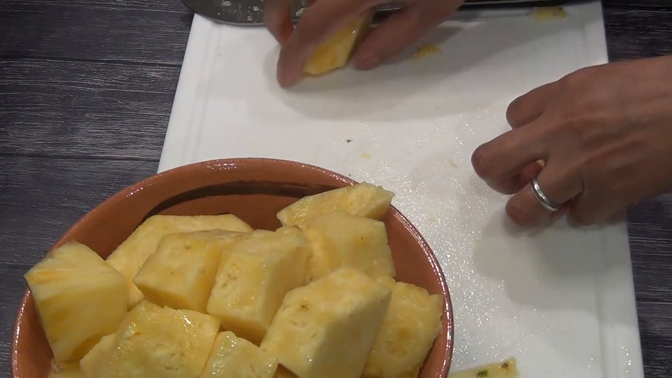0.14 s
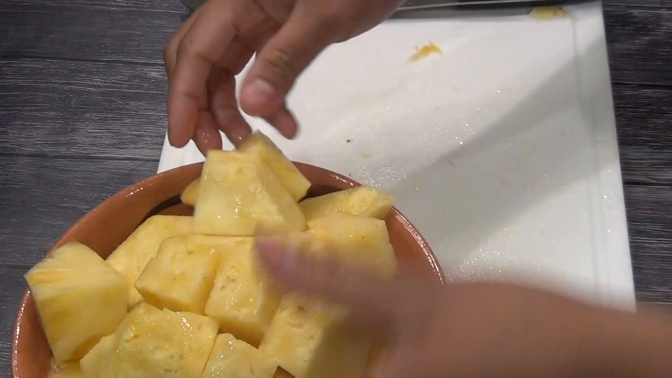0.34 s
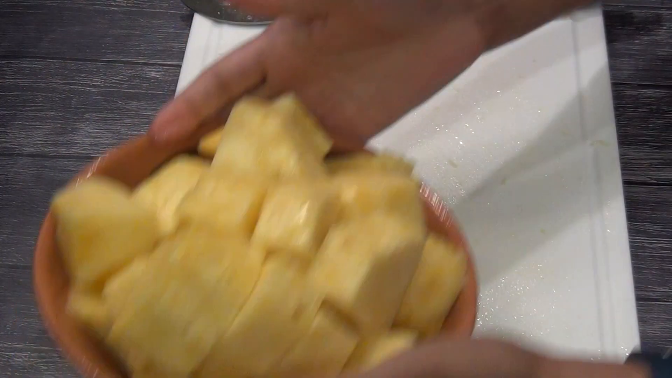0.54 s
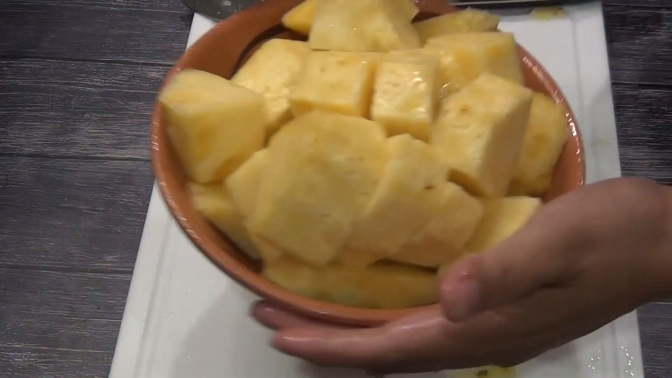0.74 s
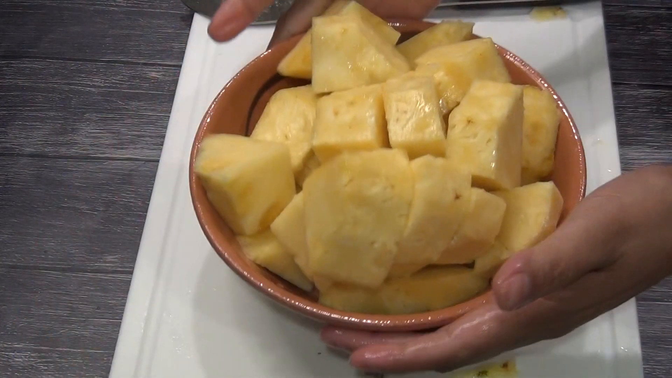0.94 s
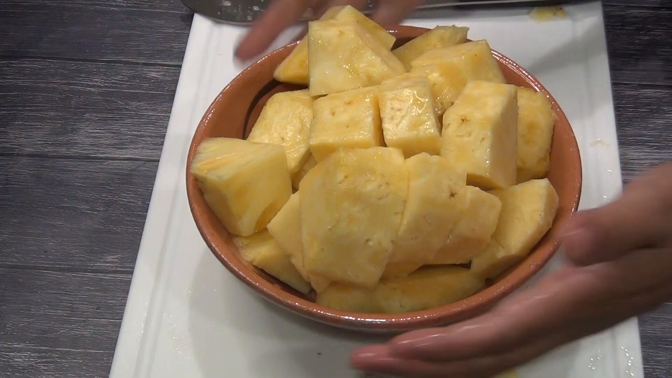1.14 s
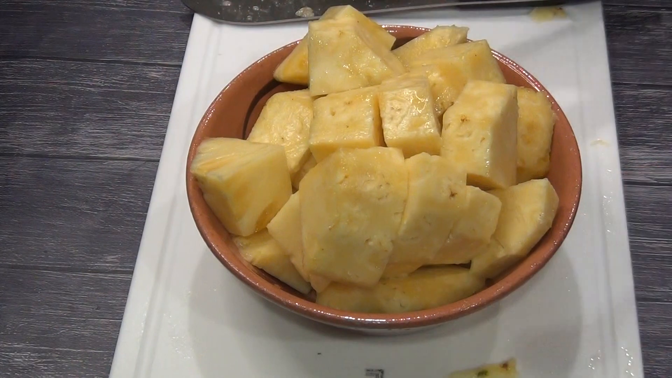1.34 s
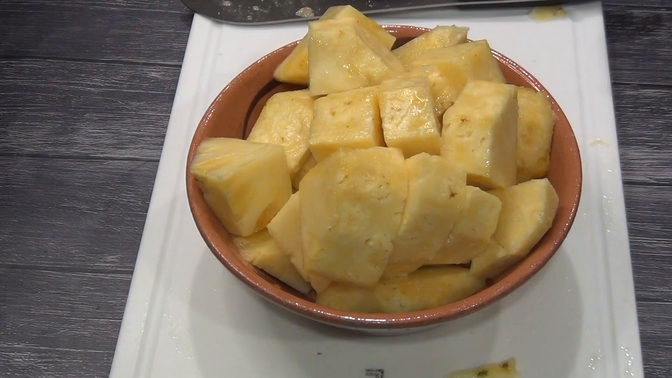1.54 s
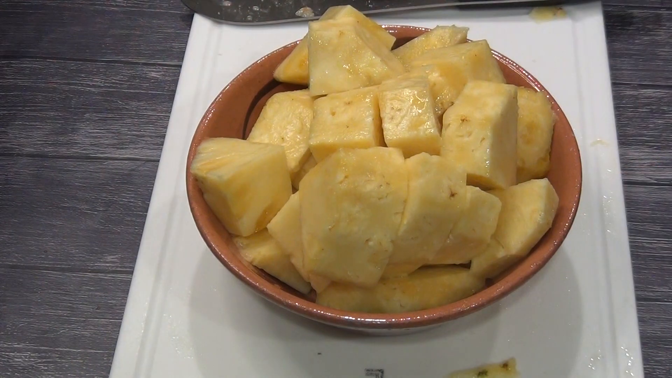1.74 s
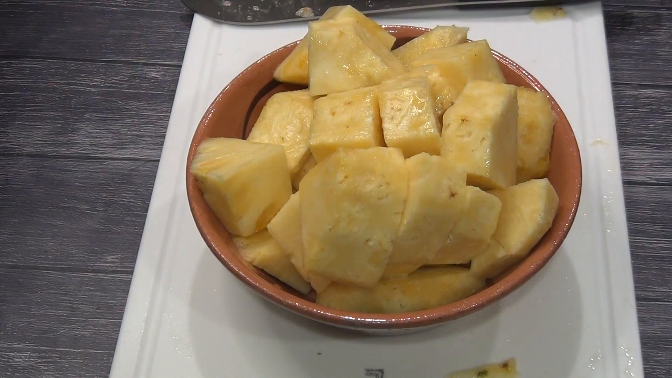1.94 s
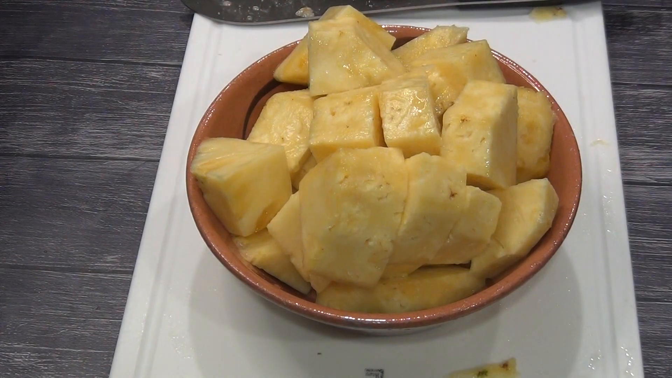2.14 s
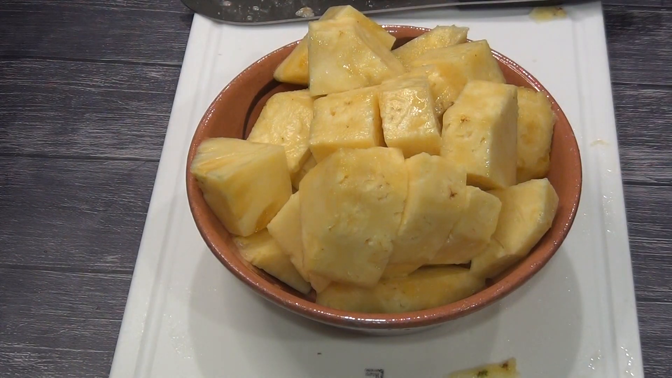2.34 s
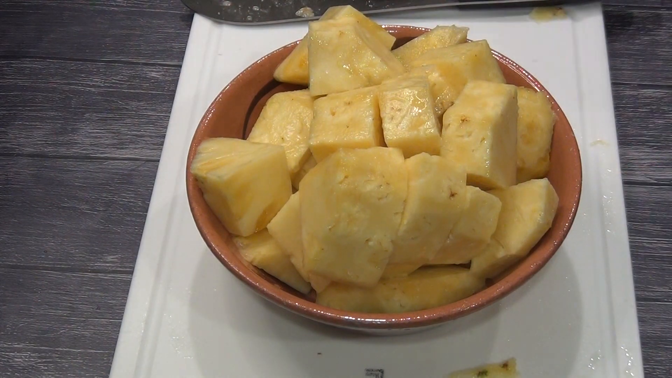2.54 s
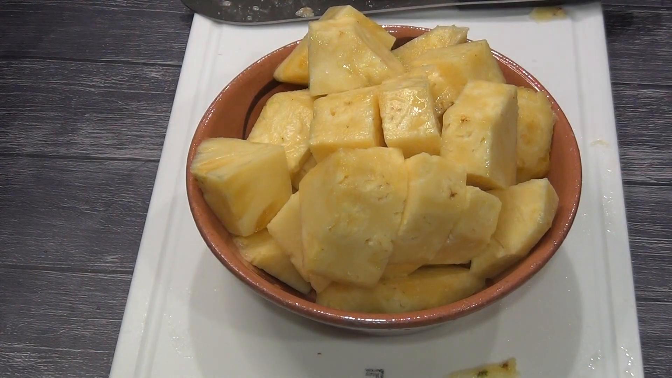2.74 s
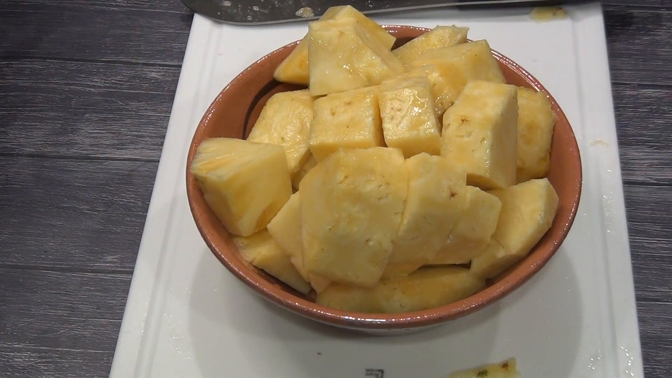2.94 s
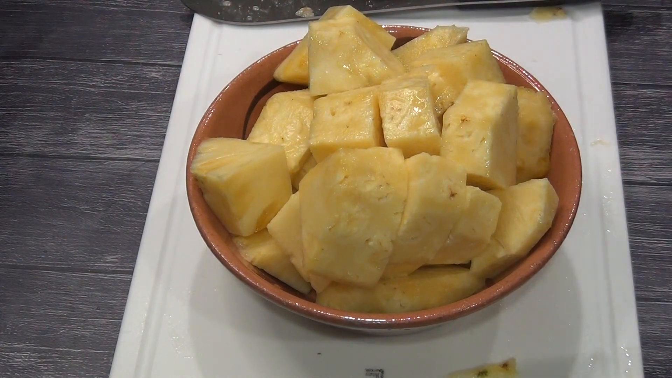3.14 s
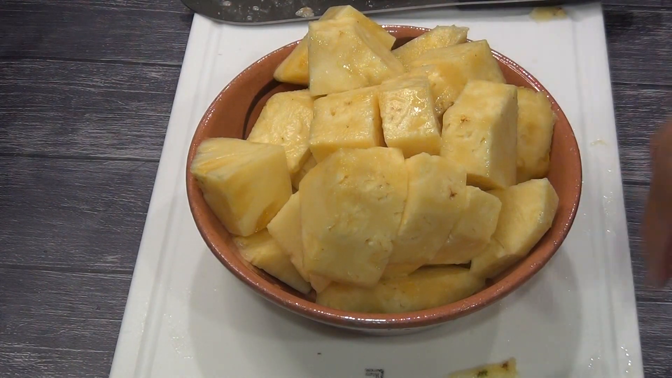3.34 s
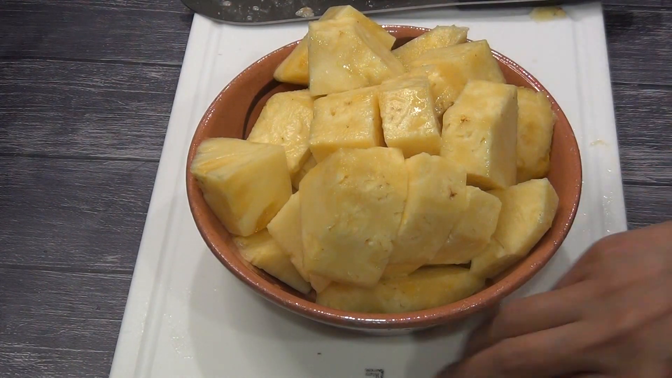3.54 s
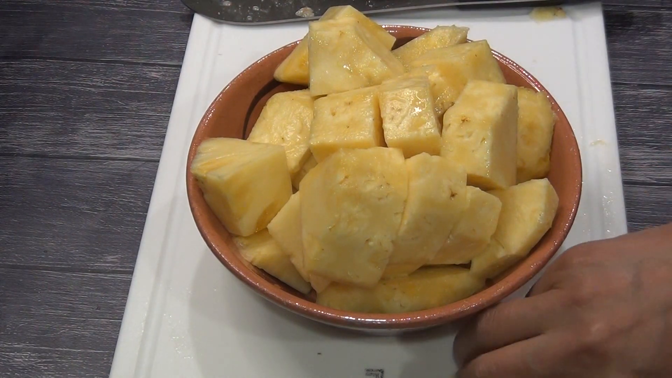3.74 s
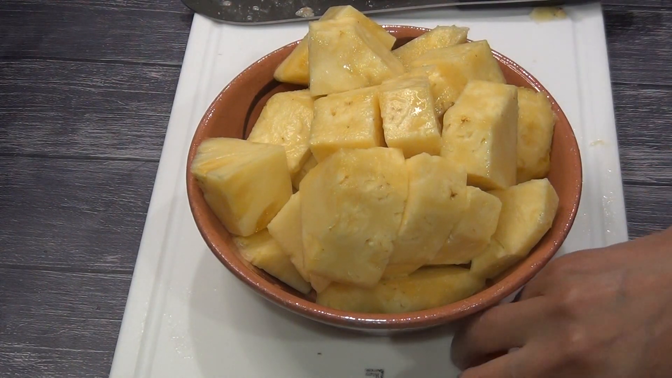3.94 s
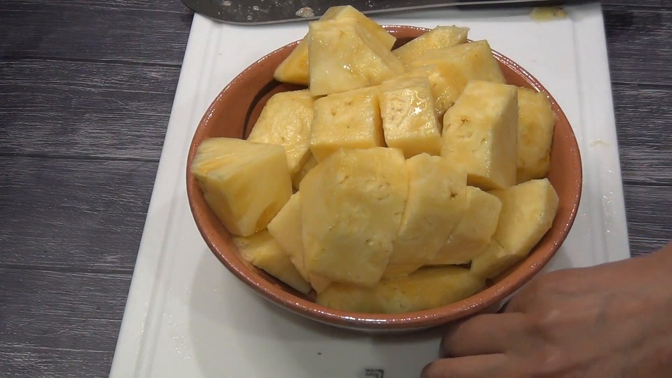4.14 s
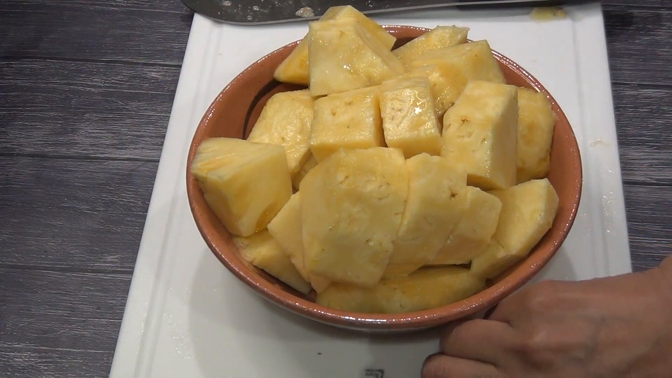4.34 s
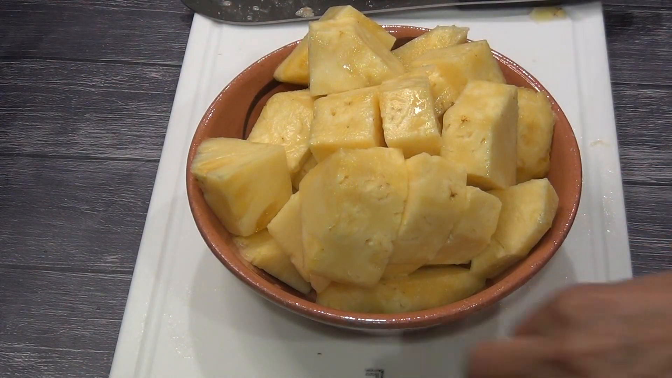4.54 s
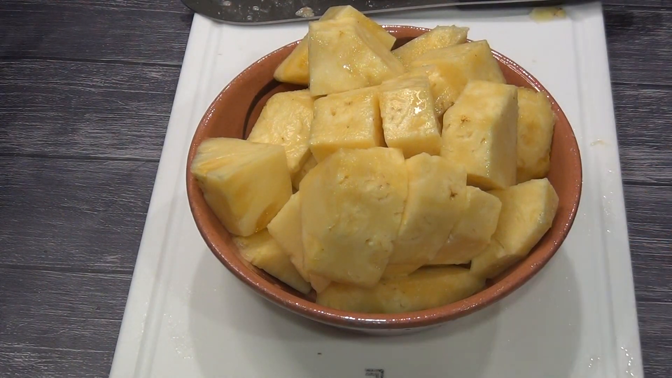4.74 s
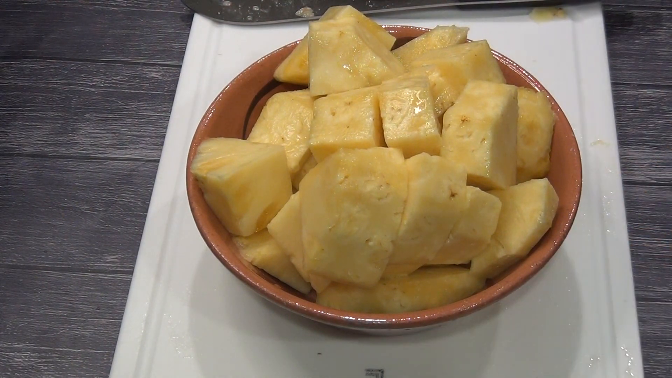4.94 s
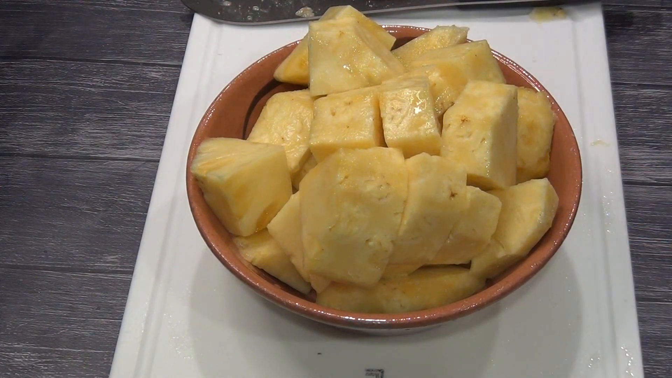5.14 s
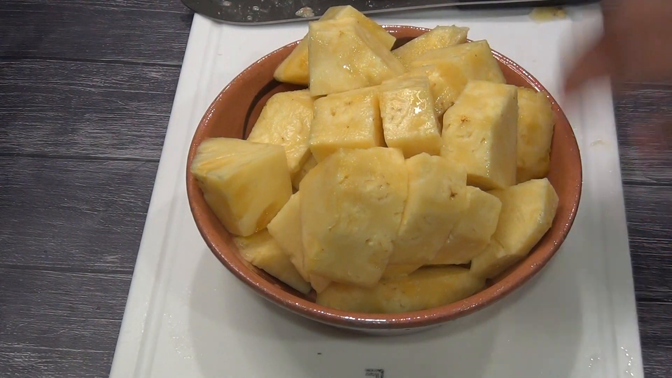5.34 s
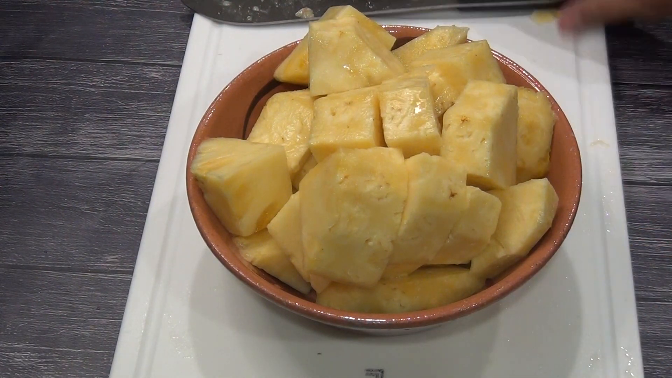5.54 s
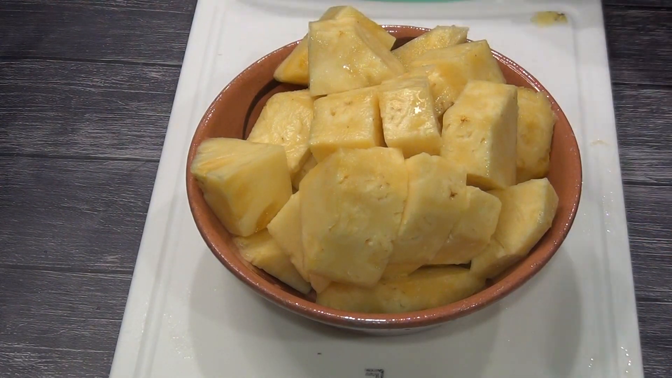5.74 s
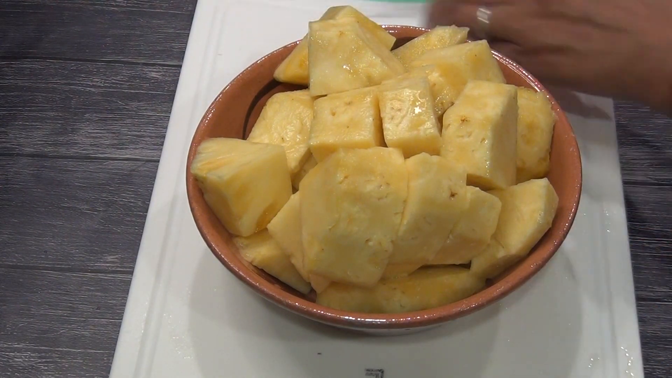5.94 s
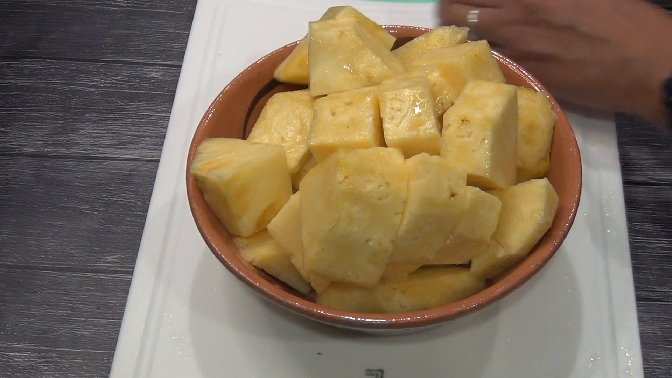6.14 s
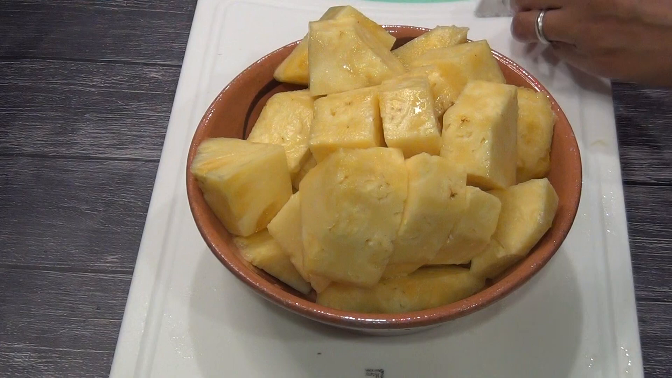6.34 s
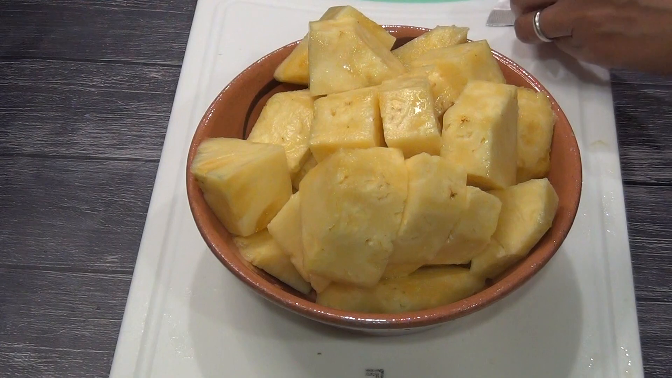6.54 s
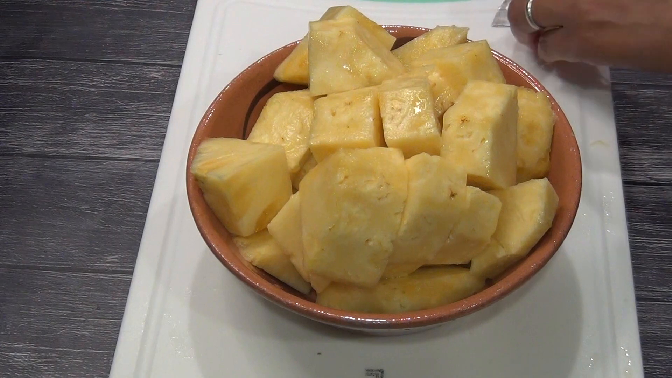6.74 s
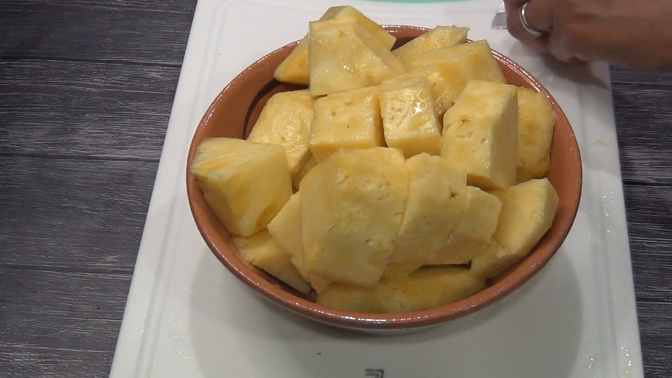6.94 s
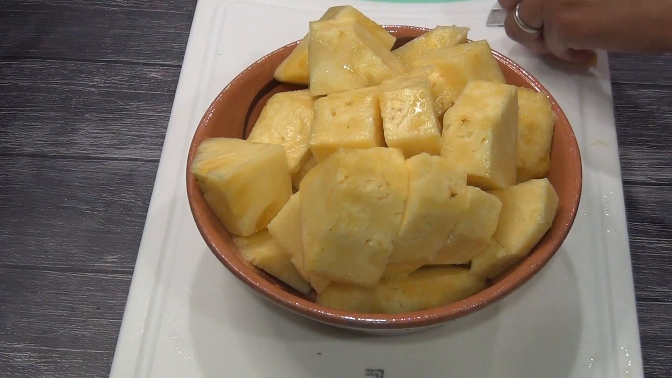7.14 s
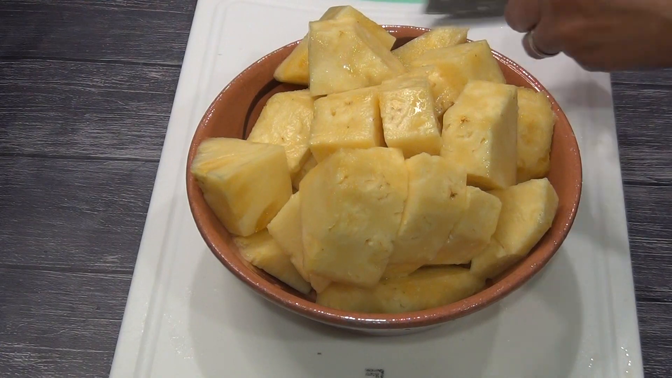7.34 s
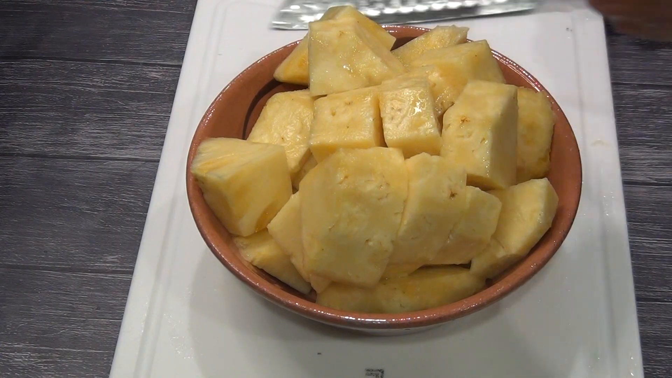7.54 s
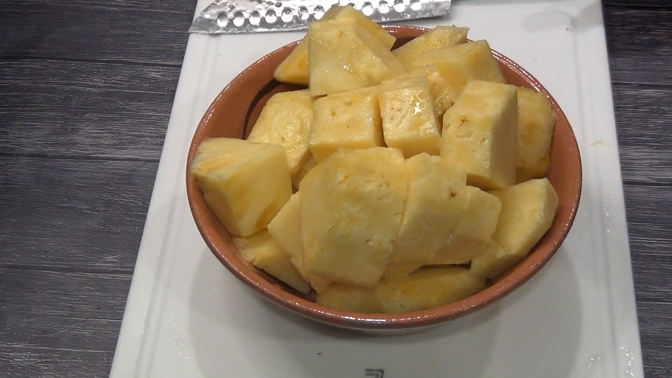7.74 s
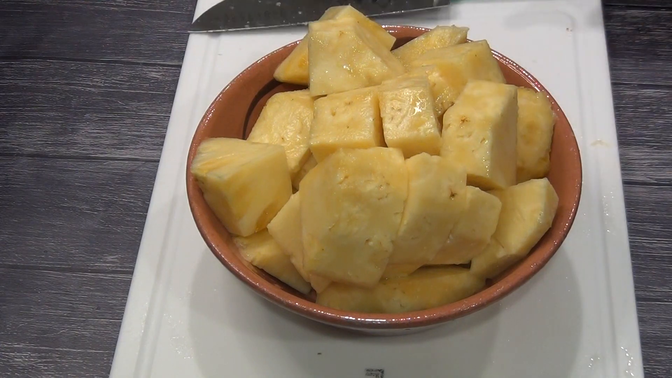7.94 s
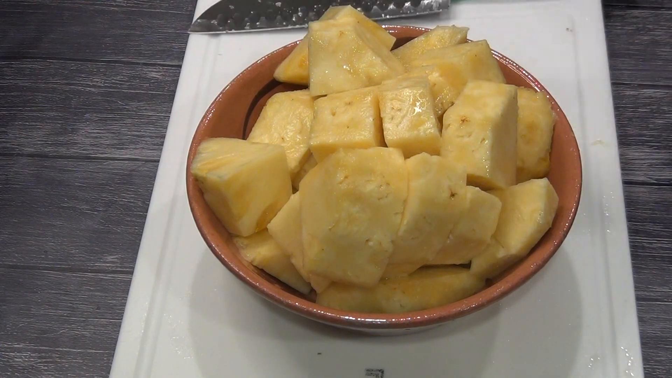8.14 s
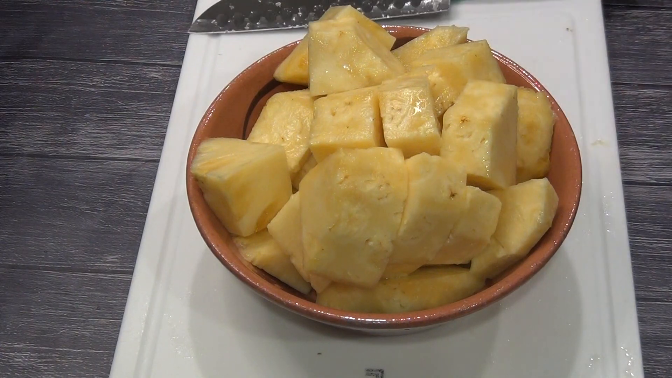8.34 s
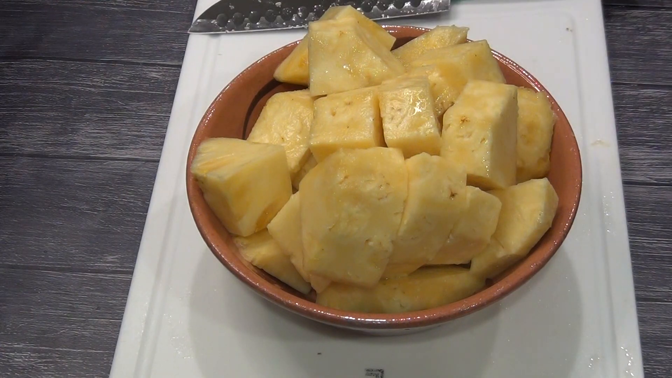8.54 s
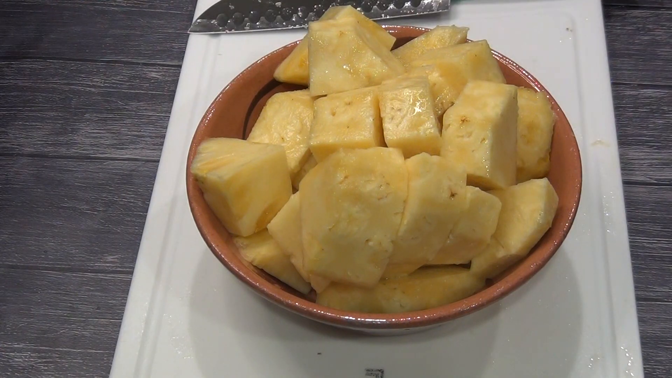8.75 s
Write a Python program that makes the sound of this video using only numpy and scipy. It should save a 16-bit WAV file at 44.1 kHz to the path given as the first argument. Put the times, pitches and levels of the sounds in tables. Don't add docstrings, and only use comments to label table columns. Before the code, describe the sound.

Half a second of silence, then the tail of a ringing steel blade cuts in abruptly. A ceramic bowl lands with a hard double knock on a plastic board. Quiet wet clicks and sleeve rustles follow, then fingers tick and scrape scraps. A knife handle knocks, the blade drags and scratches, later slaps flat, drops and rocks in quickening taps. Close microphone, tiled kitchen, faint fridge hum.

```python
import sys
import numpy as np
from scipy import signal
from scipy.fft import rfft, irfft, next_fast_len
from scipy.io import wavfile
from scipy.ndimage import uniform_filter1d, map_coordinates

SR = 44100
rng = np.random.default_rng(int(sys.argv[2]) if len(sys.argv) > 2 else 0)


def generate_wav(sig):
    pcm = np.round(np.clip(np.atleast_2d(sig).T, -1, 1) * 32767).astype(np.int16)
    wavfile.write(sys.argv[1], SR, pcm)


def convert_level_to_amplitude(level_db):
    exponent = np.asarray(level_db, float) / 20
    return 10 ** exponent


N = 388103

# [f/Hz, level/dB per Hz]
AIR_SPECTRUM = [(71, -47), (120, -8.5), (153, -7.5), (200, -8.5), (236, -3.5), (295, -2.5), (393, -5),
                (670, -5.5), (727, -8), (1190, -7), (1550, -10), (1790, -9), (2870, -16), (3660, -17.5),
                (16000, -29)]
RUMBLE_SPECTRUM = [(13, -42), (22, -5), (38, 5.5), (70, 11.5), (160, -13.5), (210, -36), (350, -120)]
# [f/Hz, width/Hz, level/dB over the air; for the two lowest, over 10 dB above the rumble]
FRIDGE_LINES = [(120.3, 5.2, -14.5), (160.2, 4.2, -17), (191.56, 2.3, -12.5), (213.2, 2.7, -18),
                (284, 2.6, -14.5), (427, 11, -19.5), (497, 9.4, -19), (675, 9.2, -14.5), (1120, 24, -15.5)]
# [t/s, level/dB]
AIR_LEVEL = [(0.7, -63.5), (1.5, -63.2), (2.66, -61), (3.8, -57.5), (4.8, -56.7), (5.7, -54.2),
             (6.45, -52.3), (7.6, -53), (8.8, -56)]
# [t/s, level/dB]
TRAFFIC_SWELLS = [
    (3.09, -71),
    (3.9, -72),
    (6.2, -72),
    (8.8, -69),
]

# [f/Hz, width/Hz, level/dB]
BLADE_MODES = [(836, 9.2, 3), (1460, 140, 2.5), (2600, 120, -4), (3230, 34, -5), (3670, 57, 2),
               (4000, 18, -13.5), (3900, 36, -8), (5330, 97, -9), (6940, 44, -7), (8090, 77, -19),
               (8540, 140, -9), (10600, 75, -10)]
BOWL_MODES = [(400, 50, -4), (694, 290, 1), (1250, 1780, 17.5), (1900, 290, 1), (3500, 900, -10),
              (5560, 4200, -2)]
SCRAP_MODES = [(1090, 110, -1), (1400, 168, -1), (1810, 22, -4.5), (2340, 20, -20), (3000, 60, -5),
               (4040, 150, -10), (5130, 47, -19), (6300, 400, -24.5)]
DRAGGED_MODES = [(853, 71, 1.5), (1580, 44, -2), (1980, 41, -2), (2285, 32, -26), (2590, 98, -4),
                 (3660, 115, -3.5), (4560, 86, -8), (5560, 120, -12.5)]
HANDLE_MODES = [(535, 256, -6), (1160, 840, -6), (2900, 700, -13), (4070, 1140, -21)]
EDGE_MODES = [(2500, 70, 4), (3500, 60, 0), (3810, 46, -4), (5300, 150, -7), (7340, 50, -7),
              (11330, 40, -9)]
BOARD_MODES = [(620, 94, -1.5), (762, 44, 5.5), (1040, 120, 2), (1550, 86, 2), (2008, 92, 0.5),
               (2620, 420, -8), (3520, 510, -11.5), (5120, 200, -10.5), (7360, 140, -11), (8100, 62, -5.5)]
# [f/Hz, level/dB per Hz]
CRACK_SPECTRUM = [(1470, -11), (2500, 3), (5270, -15.5), (8400, -26.5), (16000, -41)]
CLOTH_SPECTRUM = [(530, -22), (900, -1.5), (1460, -13), (1770, -2), (2600, -4.5), (5550, -6.5),
                  (16000, -20)]
STEEL_SPECTRUM = [(900, -35), (2000, -21), (3200, 0.5), (5500, -5), (8500, -4), (12000, -10), (15500, -17),
                  (16500, -40)]

# [t/s, level/dB, rise/s per 20 dB, fall/s per 20 dB, hold/s if any]
RING_STROKES = [
    (0.49, -44, .003, .04, .048),
    (0.565, -58, .02, .17, .025),
]
RUSTLE_STROKES = [(1.744, -58.5, .064, .1, .086), (2.17, -67, .12, .3), (2.608, -58, .45, .26),
                  (2.746, -55, .012, .045), (2.802, -53, .026, .21), (2.95, -59, .08, .015),
                  (4.57, -49.5, .017, .04), (5.238, -53.5, .06, .11), (5.95, -56, .012, .02, .04),
                  (6.01, -49.5, .055, .11), (8.208, -47, .007, .022), (8.22, -56.5, .02, .025, .09),
                  (8.74, -66, .6, .02, .06)]
PUSH_STROKES = [
    (3.66, -48, .01, .03, .06),
    (3.77, -43, .1, .02, .01),
    (3.783, -36.5, .012, .03, .012),
    (3.926, -33, .012, .027),
    (3.948, -41.5, .012, .083),
    (4.094, -52.5, .04, .057),
    (4.578, -46.5, .034, .014),
]
DRAG_STROKES = [
    (5.6, -50, .015, .21, .04),
    (5.845, -49, .12, .016),
    (6.192, -35.5, .012, .09, .065),
    (6.36, -41, .15, .03, .105),
    (6.496, -60, .02, .05, .07),
    (6.7, -57, .08, .17),
    (6.854, -51.5, .1, .07),
    (6.93, -47.5, .015, .02),
    (6.95, -55, .025, .2, .02),
]
FLAT_STROKES = [
    (5.6, -45, .015, .16, .042),
    (5.833, -42, .04, .03, .01),
    (5.87, -50, .012, .08),
    (6.254, -36, .08, .03),
    (6.357, -38.5, .1, .03, .11),
    (6.854, -57.5, .1, .08),
    (6.93, -45, .015, .012),
    (6.962, -47.5, .03, .08),
]
SCRATCH_STROKES = [
    (5.6, -59, .015, .21, .04),
    (5.845, -57, .12, .016),
    (6.225, -41, .05, .09, .035),
    (6.355, -47.5, .03, .02, .11),
    (6.3, -52, .05, .05, .05),
    (6.496, -64, .02, .05, .07),
    (6.7, -65, .08, .17),
    (6.854, -59.5, .1, .07),
    (6.93, -55.5, .015, .02),
    (6.95, -61, .025, .2, .02),
]
SKIM_STROKES = [
    (5.712, -52, .075, .15),
    (5.836, -53, .046, .023),
    (7.56, -52, .012, .05, .07),
    (7.645, -48, .1, .02, .055),
    (7.728, -41.5, .04, .022),
]
CHATTER_STROKES = [
    (7.703, -33, .012, .022, .045),
]

# [t/s, peak level/dB, crack level/dB, room level/dB]
BOWL_KNOCKS = [
    (0.541, -37, -10, -8),
    (0.993, -12, -49, 1.5),
    (1.022, -17, -10.5, 2),
    (1.057, -37, -27, -11),
]
# [t/s, peak level/dB, f/Hz, t60/s]
WORKTOP_THUMPS = [(0.993, -36, 345, 0.2), (2.171, -54.5, 239, 0.085), (2.949, -49.5, 198, 0.19),
                  (3.651, -56.5, 285, 0.31), (3.905, -46.5, 297, 0.066), (2.952, -55, 330, .13),
                  (5.019, -27.5, 300, 0.12), (5.02, -39, 500, .06), (5.02, -42, 200, .1),
                  (5.568, -29.5, 369, 0.06), (6.195, -50, 398, 0.087), (7.539, -42, 280, 0.13),
                  (7.716, -45.5, 254, 0.35), (7.774, -43, 388, 0.11), (8.368, -33.5, 240, 0.071)]
# [t/s, peak level/dB, f/Hz]
FLOOR_BOOMS = [(1.003, -52, 80.7), (2.96, -51, 137), (3.661, -55.5, 122), (3.979, -54, 124),
               (5.598, -53, 110), (6.169, -60, 68), (7.798, -48, 161), (8.206, -60, 64),
               (8.374, -45, 129.5), (8.65, -61.5, 61.1), (1.06, -59, 50), (2.97, -61, 48), (5.6, -54, 45),
               (7.77, -49, 48), (8.3, -60, 60), (8.57, -58, 48)]
# [t/s, peak level/dB, ring f/Hz, crack level/dB]
JUICE_CLICKS = [
    (2.0453, -42, 2400, -30),
    (2.0624, -49, 2070, -17),
    (2.7467, -43, 2900, -12),
    (4.821, -42, 2340, -25),
]
# [t/s, peak level/dB, ring f/Hz]
SCRAP_TICKS = [(3.6539, -31, 1120), (3.6795, -39, 1260), (3.703, -43, 1380), (3.7177, -40, 1130),
               (3.7404, -28, 1390), (3.7574, -38, 1490), (3.7878, -26.5, 1500), (3.7984, -34, 1250),
               (3.905, -18, 800), (3.925, -22, 1440), (3.9404, -30, 1350), (3.9661, -28, 1520),
               (4.0958, -38.5, 1400), (4.1574, -42, 1120), (4.4265, -38, 1250), (4.568, -45, 1240),
               (4.578, -36, 1080), (4.7042, -51, 1070)]

# [t/s, peak level/dB, low ring f/Hz, high ring f/Hz, crack level/dB] first a heavy knock at
# 5.02 s, then the dragged blade catching on the board
KNOCK_AND_CATCHES = [(5.0195, -31, 1250, 1600, -21), (6.186, -30, 1200, 1580, -30),
                     (6.193, -31, 1340, 1590, -28), (6.205, -28, 1300, 1580, -26), (6.221, -26, 1300, 1580, -24),
                     (6.241, -28, 1100, 1580, -22), (6.247, -26, 800, 1500, -20), (6.311, -32, 900, 1500, -30),
                     (6.354, -30, 918, 2000, -20), (6.385, -24, 900, 1950, -22), (6.407, -28, 894, 1500, -24),
                     (6.419, -28, 915, 2000, -18), (6.435, -29, 900, 1500, -19), (6.452, -26, 885, 1900, -22),
                     (6.467, -32, 1000, 1500, -28), (6.939, -35.5, 1030, 1450, -24)]
HANDLE_BLOWS = [
    (5.5605, -28, 600, 1700, -40),
    (5.564, -18, 900, 1100, -32),
    (5.574, -12, 1040, 2080, -22),
    (5.577, -17, 1040, 2100, -40),
    (5.582, -17, 1000, 2000, -25),
    (5.646, -19.5, 1040, 1750, -32),
    (5.651, -26, 1040, 800, -40),
    (5.852, -24, 790, 1100, -36),
    (7.775, -11.5, 820, 2100, -22),
]
EDGE_STRIKES = [
    (7.702, -22, 1090, 1000, -30),
    (7.714, -23, 740, 3000, -20),
    (7.718, -19, 1060, 1460, -20),
    (7.725, -20, 800, 3000, -22),
    (7.731, -17, 1040, 3500, -18),
    (7.739, -22, 1010, 1470, -22),
    (8.366, -24, 1200, 2080, -13),
    (8.37, -14, 1270, 1900, -13),
    (8.382, -27, 820, 2500, -13),
    (8.391, -27, 800, 1850, -14),
]
BOWL_HUM_KNOCK = (8.374, -25, 812, 2170, -40)
# the same columns, then [room level/dB]
FLAT_SLAPS = [
    (7.5405, -11, 1000, 1700, -30, -13),
    (7.545, -19, 1000, 1700, -40, -13),
    (7.5625, -19, 980, 1690, -32, -13),
    (7.566, -22, 1000, 1690, -40, -13),
]
# [t/s, length/s, f/Hz, level/dB]
SUNG_MODES = [(5.585, .055, 770, -41), (5.6, .035, 1050, -43), (5.595, .03, 1550, -47),
              (5.605, .03, 2110, -50), (5.655, .055, 770, -46), (5.655, .05, 1030, -44),
              (5.655, .07, 1650, -53), (5.67, .035, 2050, -55), (5.715, .04, 1480, -50),
              (5.7, .06, 2730, -62), (5.695, .08, 5000, -61), (5.76, .07, 1950, -54),
              (5.805, .055, 3550, -58), (5.805, .055, 5500, -63), (5.87, .05, 850, -54),
              (7.575, .04, 7330, -55), (7.63, .03, 7330, -56), (7.6, .04, 5600, -62),
              (7.625, .02, 2700, -53), (7.668, .025, 2440, -49), (7.655, .04, 3810, -57),
              (7.65, .06, 8800, -57), (7.682, .018, 1000, -45), (7.7, .016, 1090, -31),
              (7.73, .027, 1040, -31), (8.38, .08, 820, -47)]
# [f/Hz, t60/s]
ROOM_DECAY = [(100, 0.35), (400, 0.81), (1200, 0.64), (3000, 0.56), (6000, 0.46), (12000, 0.11)]


def unit(x):
    return x / np.sqrt(np.mean(x ** 2) + 1e-20)


def along(points, hz):
    f, v = np.transpose(points)
    return np.interp(np.log(hz + 1), np.log(f + 1), v)


def wobble(rate):
    knots = rng.standard_normal(int(N * rate / SR) + 4)
    return map_coordinates(knots, [np.arange(N) * rate / SR])


def filtered(x, response):
    n = x.shape[-1]
    m = next_fast_len(n + 8192)
    return irfft(rfft(x, m) * response(np.fft.rfftfreq(m, 1 / SR)), m)[..., :n]


def peak(f, hz, width):
    return 1j * f * width / (hz * hz - f * f + 1j * f * width)


def body(modes, damping):
    def response(f):
        return sum((-1) ** k * convert_level_to_amplitude(db) * peak(f, hz, width * damping)
                   for k, (hz, width, db) in enumerate(modes))
    return response


def strokes(rows):
    t = np.arange(0, N / SR + .002, .001)
    power = 1e-11
    for s, db, rise, fall, *hold in rows:
        before = np.maximum((s - t) / abs(rise), 0)
        after = np.maximum((t - s - abs(sum(hold))) / abs(fall), 0)
        power = power + convert_level_to_amplitude(2 * db - 40 * np.minimum(before + after, 10))
    return np.interp(np.arange(N) / SR, t, 10 * np.log10(power))


def grit(spiky_db, rate):
    return unit(rng.standard_normal(N) * convert_level_to_amplitude(spiky_db * wobble(rate)))


def slide(level_db, modes, damping, spiky_db, rate, soft_hz=9000):
    shape = lambda f: body(modes, damping)(f) / (1 + 1j * f / soft_hz)
    return convert_level_to_amplitude(level_db) * unit(filtered(grit(spiky_db, rate), shape))


def patchy(x, depth_db, bins, frames):
    z = signal.stft(x, nperseg=256)[2]
    field = uniform_filter1d(rng.standard_normal(z.shape), bins, 0)
    field = uniform_filter1d(field, frames, 1)
    return signal.istft(z * convert_level_to_amplitude(depth_db * unit(field)), nperseg=256)[1][:len(x)]


def knocks(rows, modes, damping, rings_db, ring_q, soft_hz, rough, contact_ms, lag_ms,
           level_db, crack_db, room_rings=1):
    s, db, low_hz, high_hz, bright_db, room_db = (c[:, None] for c in np.transpose(rows))
    t = np.arange(3072) / SR
    fade = np.exp(-t * 1000 / contact_ms)
    chance = rng.standard_normal((len(rows), 2, len(t)))

    def rings(f):
        low = 1 + convert_level_to_amplitude(rings_db[0]) * peak(f, low_hz, low_hz / ring_q)
        high = 1 + convert_level_to_amplitude(rings_db[1]) * peak(f, high_hz, high_hz / ring_q)
        return low * high

    def shape(f):
        bend = np.exp(-4j * np.pi * lag_ms * np.sqrt(f / 1000))
        return body(modes, damping)(f) * rings(f) * bend / (1 + 1j * f / soft_hz) ** 2

    def room_shape(f):
        return shape(f) * rings(f) ** (room_rings - 1)

    def edge(f):
        return convert_level_to_amplitude(along(CRACK_SPECTRUM, f)) * peak(f, 8700, 8400)

    def top(x):
        return x / np.abs(x).max(axis=1, keepdims=True)

    def size(x):
        return np.linalg.norm(x, axis=1, keepdims=True)

    click = (t == t[8]) + 0 * s
    chatter = rough * chance[:, 0] * fade / np.linalg.norm(fade)
    knock = top(filtered(click + chatter, shape))
    crack = filtered(chance[:, 1] * (np.exp(-t / 0.0018) + 0.5 * fade), edge)
    crack = convert_level_to_amplitude(bright_db + crack_db) * top(crack)
    direct = knock + crack
    room_knock, room_crack = filtered(click, room_shape), filtered(click, edge)
    spread = size(knock) * room_knock / size(room_knock) + size(crack) * room_crack / size(room_crack)
    out = np.zeros((5, N + len(t)))
    starts = np.round((s[:, 0] - lag_ms / 2500) * SR).astype(int)
    for k, at in enumerate(starts):
        out[0, at:at + len(t)] += convert_level_to_amplitude(db[k] + level_db) * direct[k]
        out[1 + k % 4, at:at + len(t)] += convert_level_to_amplitude(db[k] + level_db + room_db[k]) * spread[k]
    return out[:, :N]


def floor():
    air_db = np.interp(np.arange(N) / SR, *np.transpose(AIR_LEVEL))
    steady = convert_level_to_amplitude(-78 + 1.15 * (air_db - air_db.mean()))
    swell_rise_s, swell_fall_s = .6, 1.2
    swells = convert_level_to_amplitude(strokes([(*s, swell_rise_s, swell_fall_s) for s in TRAFFIC_SWELLS]))
    rumble_db = 20 * np.log10(np.hypot(steady, swells))
    noise = rng.standard_normal((3, N))

    def lines(rows):
        response = lambda f: sum(convert_level_to_amplitude(db) * peak(f, hz, w) ** 2 * np.sqrt(2 * SR / np.pi / w)
                                 for hz, w, db in rows)
        return filtered(noise[1], response)

    air = unit(filtered(noise[0], lambda f: convert_level_to_amplitude(along(AIR_SPECTRUM, f))))
    hum = lines(FRIDGE_LINES[2:])
    drone = lines(FRIDGE_LINES[:2])
    rumble = unit(filtered(noise[2], lambda f: convert_level_to_amplitude(along(RUMBLE_SPECTRUM, f))))
    high = convert_level_to_amplitude(air_db - 2.0 + .45 * wobble(6)) * (air + hum)
    low = convert_level_to_amplitude(rumble_db + 5.0 + 1.4 * wobble(5.5)) * (rumble + convert_level_to_amplitude(10) * drone)
    return high + low


def ringing_blade():
    modes = BLADE_MODES + [(1190, 1600, -10), (5950, 3900, -36)]
    return slide(strokes(RING_STROKES) - 1, modes, damping=1.5, spiky_db=3.3, rate=86, soft_hz=7500)


def bowl():
    low_hz, high_hz = 1170, 2420
    rows = [(s, db, low_hz, high_hz, *rest) for s, db, *rest in BOWL_KNOCKS]
    return knocks(rows, BOWL_MODES, damping=0.62, rings_db=(-2, -8), ring_q=8, soft_hz=4630, rough=0.56,
                  contact_ms=1.4, lag_ms=2.193, level_db=-0.5, crack_db=0)


def thumps():
    out = np.zeros(N + SR)
    t = np.arange(SR // 3) / SR
    boom_t60_s = .31
    for s, db, hz, t60 in WORKTOP_THUMPS + [(*b, boom_t60_s) for b in FLOOR_BOOMS]:
        dull = lambda f: peak(f, hz, 1.07 * hz) * peak(f, hz, 3 * hz)
        puff = unit(filtered(rng.standard_normal(len(t)), dull))
        boom = np.sin(2 * np.pi * hz * t) + 0.45 * np.sin(2 * np.pi * 1.2 * hz * t) + 0.42 * puff
        onset = 1 - np.exp(-t / 0.0033)
        out[round(s * SR):][:len(t)] += convert_level_to_amplitude(db + 3 - 60 * t / t60) * onset * boom
    return out[:N]


def rustle():
    hiss = unit(filtered(grit(1.8, 90), lambda f: convert_level_to_amplitude(along(CLOTH_SPECTRUM, f))))
    return convert_level_to_amplitude(strokes(RUSTLE_STROKES) - 4.1) * hiss


def fruit_clicks():
    overtone, room_db = 1.15, -11
    rows = [(s, db, hz, overtone * hz, crack, room_db) for s, db, hz, crack in JUICE_CLICKS]
    return knocks(rows, [(3000, 4000, 0)], damping=1, rings_db=(15, 9), ring_q=7.1, soft_hz=9000, rough=1.0,
                  contact_ms=2.9, lag_ms=0.37, level_db=-2.0, crack_db=11)


def scrap_ticks():
    high_hz, crack_db, room_db = 3050, -20, -16
    rows = [(*r, high_hz, crack_db, room_db) for r in SCRAP_TICKS]
    return knocks(rows, SCRAP_MODES, damping=2.4, rings_db=(6, 2.5), ring_q=7.4, soft_hz=5500, rough=0.98,
                  contact_ms=4, lag_ms=1.48, level_db=-3.0, crack_db=15)


def pushed_scraps():
    return slide(strokes(PUSH_STROKES) - 3.5, SCRAP_MODES, damping=4.5, spiky_db=4.5, rate=120, soft_hz=4000)


def knife_contacts():
    kinds = [(HANDLE_BLOWS, -12.5), (KNOCK_AND_CATCHES, -9), (EDGE_STRIKES, -7), ([BOWL_HUM_KNOCK], 1.5)]
    rows = [(*row, room_db) for table, room_db in kinds for row in table]
    rows = sorted(rows, key=lambda r: r[0])
    return knocks(rows, HANDLE_MODES, damping=1.28, rings_db=(11, 13), ring_q=11.8, soft_hz=3000, rough=.35,
                  contact_ms=5, lag_ms=1.6, level_db=-0.9, crack_db=11, room_rings=.7)


def sung_modes():
    s, length, hz, db = (c[:, None] for c in np.transpose(SUNG_MODES))
    t = np.arange(6144) / SR
    q = 26
    tone = filtered(rng.standard_normal((len(SUNG_MODES), len(t))), lambda f: peak(f, hz, hz / q) ** 2)
    swell = np.sin(np.pi * np.clip(t / length, 0, 1)) ** .6
    power = (swell * tone ** 2).sum(1, keepdims=True) / swell.sum(1, keepdims=True)
    tone = convert_level_to_amplitude(db) * swell * tone / np.sqrt(power)
    out = np.zeros(N + len(t))
    for at, row in zip(np.round(s[:, 0] * SR).astype(int), tone):
        out[at:at + len(t)] += row
    return out[:N]


def dragged_knife():
    drag = slide(strokes(DRAG_STROKES) - .8, DRAGGED_MODES[1:3] + [(1170, 30, 0)], damping=7, spiky_db=1.5,
                 rate=300, soft_hz=2500)
    flat = slide(strokes(FLAT_STROKES) - .7, DRAGGED_MODES[:1], damping=3.3, spiky_db=1.5,
                 rate=200, soft_hz=1200)
    return patchy(drag + flat, 1.5, bins=2, frames=8)


def scratch():
    modes = DRAGGED_MODES[4:] + [(7400, 600, -17)]
    bite = slide(strokes(SCRATCH_STROKES), modes, damping=5, spiky_db=2.6, rate=400, soft_hz=7000)
    return patchy(bite, 2.2, bins=2, frames=5)


def skimming_edge():
    level_db = strokes(SKIM_STROKES)
    sing = slide(level_db - 5, EDGE_MODES, damping=1.3, spiky_db=4, rate=45)
    hiss = unit(filtered(grit(2.2, 200), lambda f: convert_level_to_amplitude(along(STEEL_SPECTRUM, f))))
    return patchy(convert_level_to_amplitude(level_db - 2.5) * hiss + sing, 2.3, bins=2, frames=9)


def flat_slaps():
    return knocks(FLAT_SLAPS, [(1400, 1500, 0)], damping=1.1, rings_db=(15, 15.5), ring_q=9, soft_hz=3500,
                  rough=.3, contact_ms=4, lag_ms=.8, level_db=-.7, crack_db=11, room_rings=.6)


def chattering_edge():
    modes = [(640, 260, -12), BOARD_MODES[2]]
    return slide(strokes(CHATTER_STROKES) - .7, modes, damping=.9, spiky_db=1.5, rate=52, soft_hz=1500)


def rocking_knife():
    start_s, period_s, shrink, loss_db, landing_db = 7.795, .137, .923, 2.5, 4.5
    bounce_s, bounce_db = .014, -10
    heel_lag_s, heel_gains_s = .059, .009
    tip_db, tip = -23, (1040, 2510, -17, -10.5)
    heel_db, heel = -22.3, (1090, 2780, -15, -13)
    rows = []
    for k in range(5):
        s = start_s + period_s * (1 - shrink ** k) / (1 - shrink)
        lost_db = loss_db * k
        rows.append((s, tip_db - lost_db + landing_db * (k == 0), *tip))
        rows.append((s + bounce_s, tip_db - lost_db + bounce_db, *tip[:2], -60, tip[3]))
        rows.append((s + heel_lag_s - heel_gains_s * k, heel_db - lost_db, *heel))
    return knocks(rows, BOARD_MODES, damping=0.73, rings_db=(8, 12), ring_q=9, soft_hz=5000, rough=0.4,
                  contact_ms=2.8, lag_ms=1.8, level_db=-0.2, crack_db=7, room_rings=.1)


def kitchen(sends):
    hz, t, z = signal.stft(rng.standard_normal((4, SR * 3 // 4)), SR, nperseg=256)
    late = convert_level_to_amplitude(-60 * t / along(ROOM_DECAY, hz)[:, None])
    near = 0.55 * convert_level_to_amplitude(-60 * t / 0.14)
    tail = signal.istft(z * (late + near), SR, nperseg=256)[1]
    tail = tail / np.linalg.norm(tail, axis=1, keepdims=True)
    tail = np.pad(tail, ((0, 0), (round(0.0033 * SR), 0)))
    return signal.fftconvolve(sends, tail, axes=1)[:, :N].sum(axis=0)


def scene():
    background = floor()
    rubs = ringing_blade() + pushed_scraps() + sung_modes() + dragged_knife()
    rubs = rubs + scratch() + skimming_edge() + chattering_edge()
    hits = bowl() + fruit_clicks() + scrap_ticks() + knife_contacts() + flat_slaps() + rocking_knife()
    boom = thumps()
    sends = hits[1:] + (convert_level_to_amplitude(-20) * rubs + convert_level_to_amplitude(-24) * boom)
    return (hits[0] + rubs + boom + rustle() + kitchen(sends) + background)[None]


def top_cut(x):
    return signal.sosfilt(signal.butter(12, 16430, fs=SR, output="sos"), x)


def record(dry):
    top_hz, bass_hz, start_s = 15830, 38, .4935
    heard = filtered(dry, lambda f: (f < top_hz) * (1j * f / (bass_hz + 1j * f)) ** 2)
    mix = heard * (np.arange(N) >= start_s * SR)
    return top_cut(mix)


dry = scene()
out = record(dry)
generate_wav(out)
```